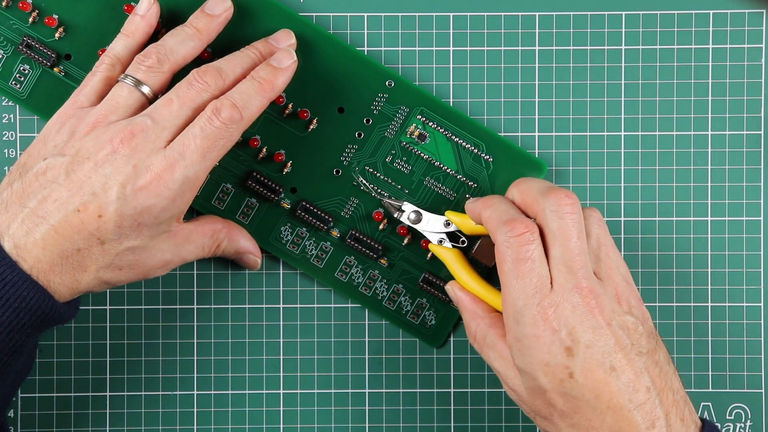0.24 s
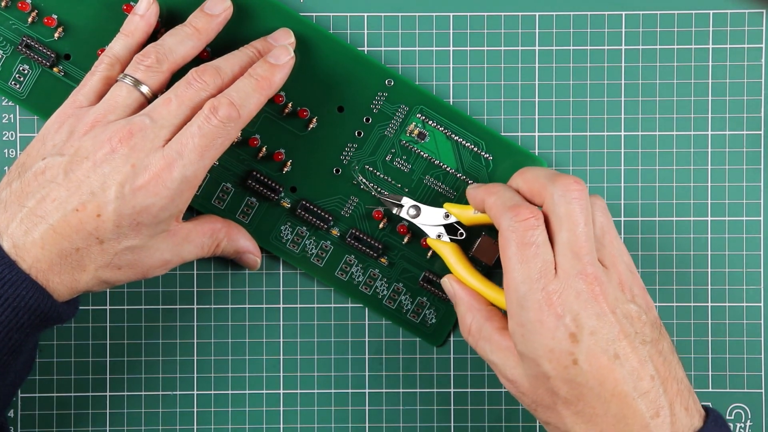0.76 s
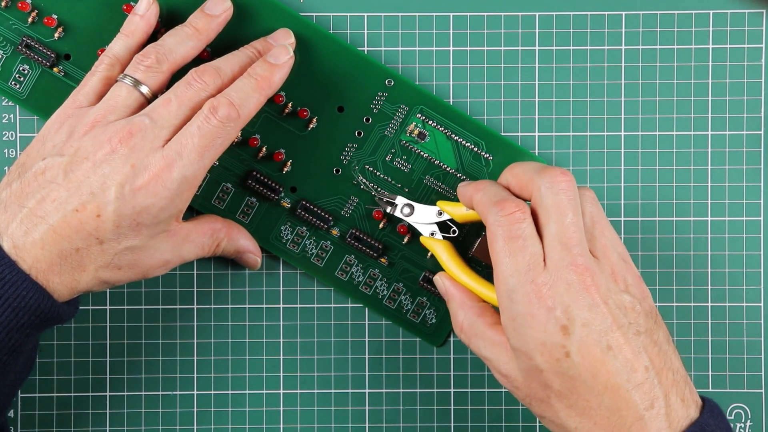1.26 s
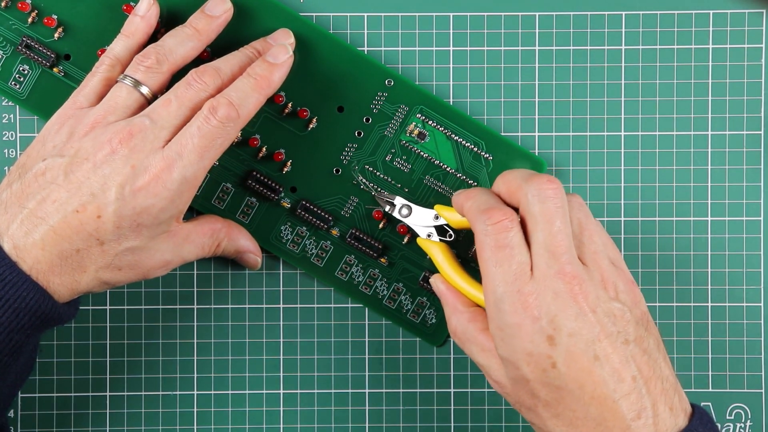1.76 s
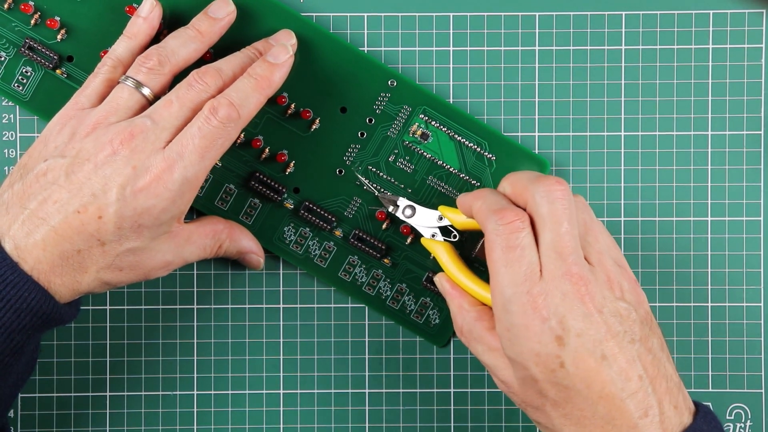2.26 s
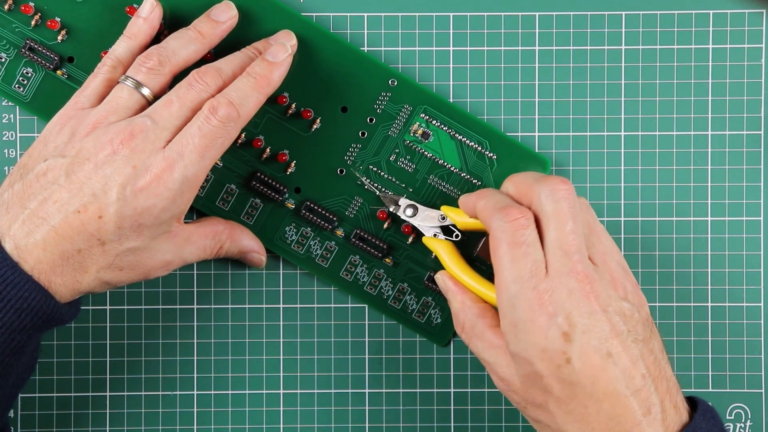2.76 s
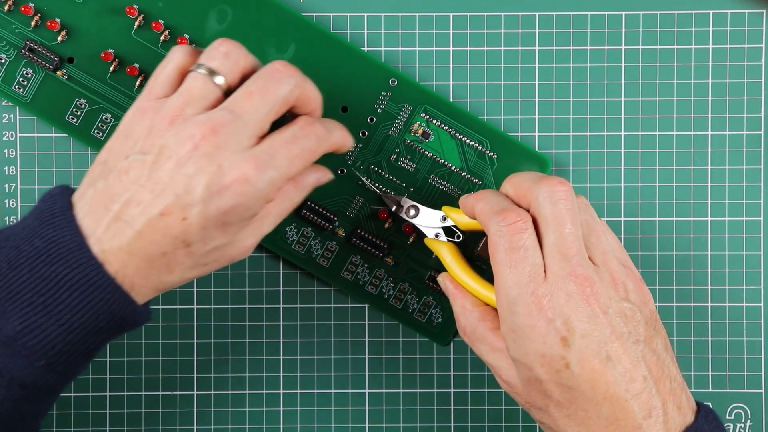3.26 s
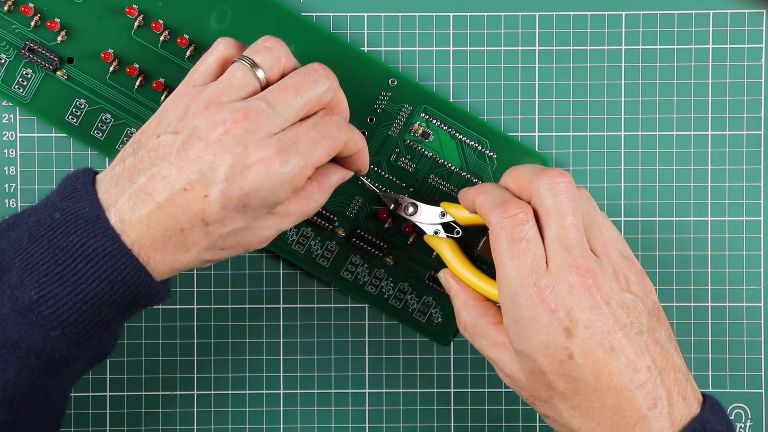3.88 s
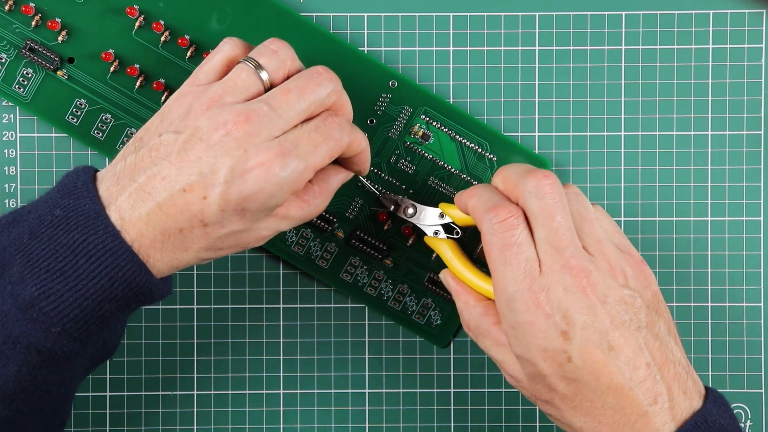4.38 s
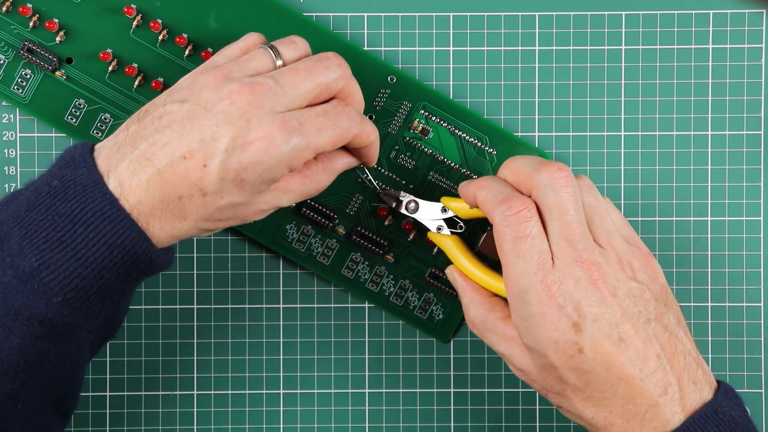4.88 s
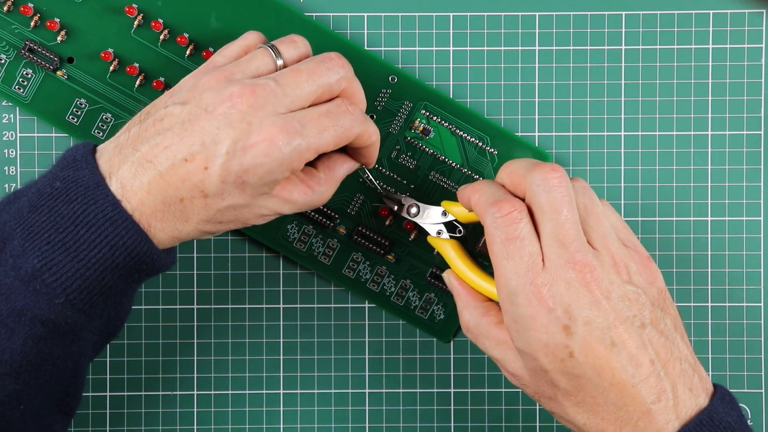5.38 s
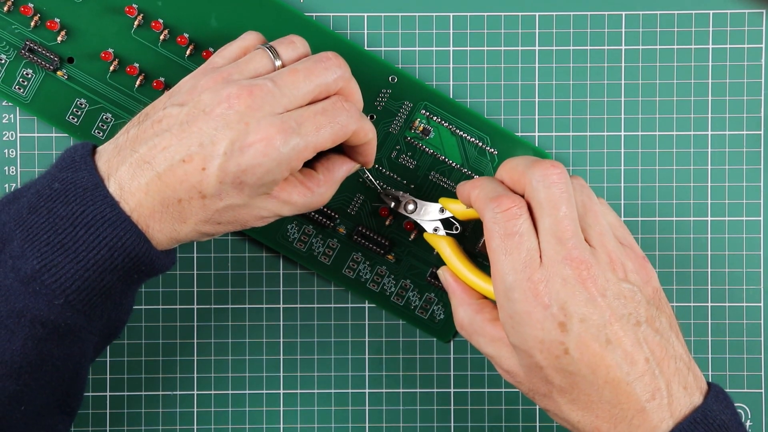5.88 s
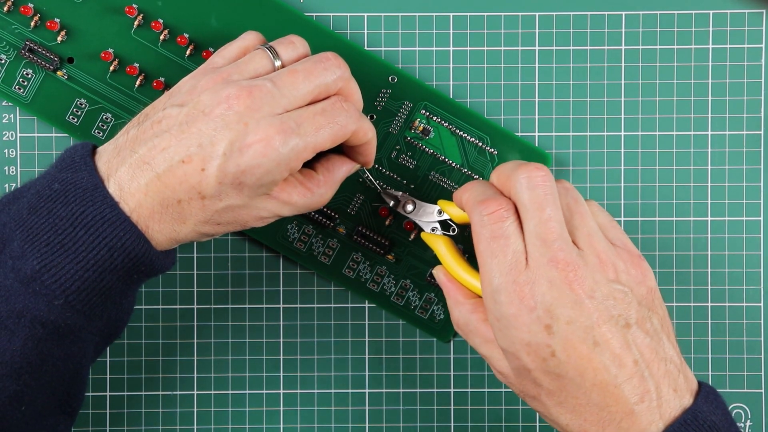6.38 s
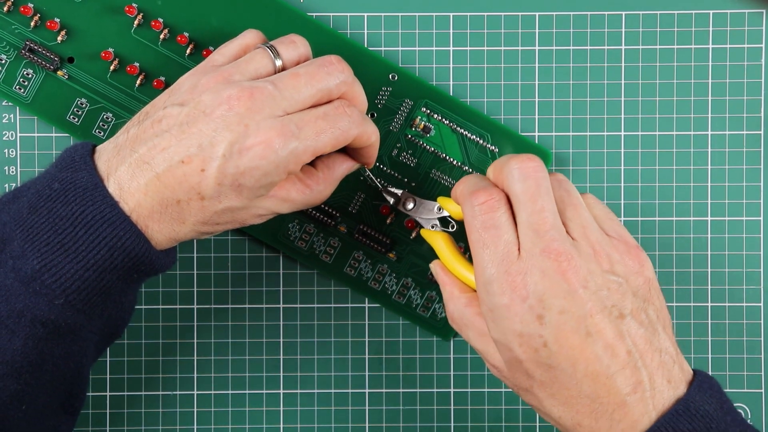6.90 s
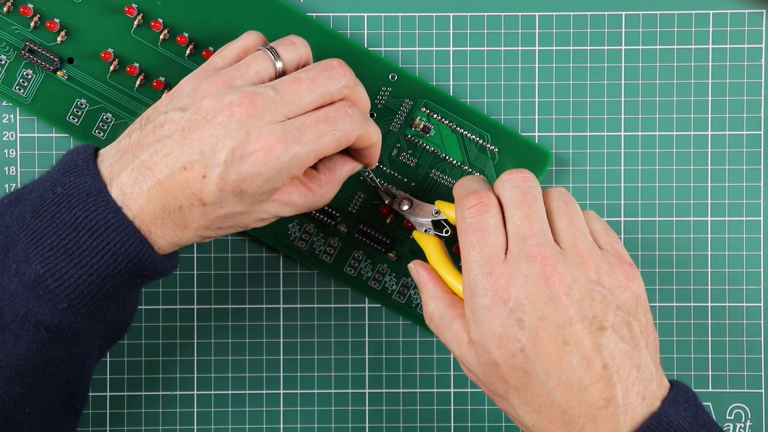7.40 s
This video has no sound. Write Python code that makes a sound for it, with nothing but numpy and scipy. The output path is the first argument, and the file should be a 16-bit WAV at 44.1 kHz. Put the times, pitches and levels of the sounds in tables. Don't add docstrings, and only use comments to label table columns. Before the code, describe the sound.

Close, mostly dry sound in a small room, with very low swaying building rumble and faint hiss that ducks after each loud sound. At 0.4 s small steel cutters snip a lead: a sharp click with a clack right behind it, then tiny bright offcut ticks and scratches until 0.8. A short dull board thud comes at 0.95, with soft jaw clacks at 1.1 and 1.3. At 2.07 a second snip is louder in the wire, brighter and crisper. The board knocks on the mat at 2.34 and 2.41, weaker at 2.86. Around 3.1 tips touch with a brief metallic ring; scrapes follow at 3.3-3.5. Sparse faint touches and scratches fill 3.9-5. Clacks and a board nudge at 5.2-5.3 lead to two hard jaw snaps at 5.43 and 5.47. Quiet nudges and ticks follow, a clack at 7.36 and a last bright tick at 7.63.

```python
import sys
import numpy as np
from scipy import signal
from scipy.fft import rfft, irfft, next_fast_len
from scipy.io import wavfile
from scipy.ndimage import uniform_filter1d, map_coordinates

SR = 44100
rng = np.random.default_rng(int(sys.argv[2]) if len(sys.argv) > 2 else 0)


def log_audio(samples):
    frames = np.atleast_2d(samples).T
    limited = np.clip(frames, -1, 1)
    pcm = np.round(limited * 32767).astype(np.int16)
    wavfile.write(sys.argv[1], SR, pcm)


def boost_factor(decibels):
    exponent = np.asarray(decibels, float) / 20
    return 10 ** exponent


N = 337365

# freq_hz, density_db_per_hz
RUMBLE_SPECTRUM = [(8.8, -40.5), (15, -6.5), (55, -1.5), (130, -9.5), (204, -14), (269, -18.5), (308, -35),
                   (400, -28), (520, -76.5), (880, -120)]
# time_s, level_db; it swells with the heavier blows and drops briefly at 1.64 s and
# 2.83 s
RUMBLE_LEVEL = [(0.0, -77), (0.04, -64.5), (0.36, -64), (0.47, -52), (0.58, -65.5), (1.25, -66),
                (1.38, -58), (1.64, -76), (1.66, -66), (2.73, -61.5), (2.83, -76.5), (2.9, -60.5),
                (3.32, -66), (5.41, -62.5), (5.43, -53), (5.67, -67), (7.56, -66.5), (7.65, -56.5)]
RUMBLE_GAIN_DB, RUMBLE_SWAY_DB = 2.5, 1.05

BAND_EDGES_HZ = [280, 900, 1500, 2500, 4800, 7600, 12100, 15800]
# hiss_db, memory_s, cut_db_per_db under remembered level, deepest_cut_db
SUPPRESSOR = [(-78, 0.71, 0.47, 16), (-81, .65, 0.8, 11.5), (-81.5, .75, 1, 15), (-79.5, 0.72, 1, 25.5),
              (-77, 0.81, 0.83, 27), (-75, .72, 0.73, 25), (-75.5, 0.47, 0.4, 13)]
LOUD_POWER = .22
FAST_S, SMOOTH_S = 0.058, 0.022
TAIL_SHARE = 0.19

# freq_hz, t60_s
ROOM_DECAY = [(250, .75), (1000, .68), (3000, .55), (8000, .4), (12000, .33), (16000, .28)]
# freq_hz, gain_db
TOP_ROLLOFF = [(15500, -0.5), (16000, -10.5), (16800, -26)]
TOP_HZ = 16800

# freq_hz, width_hz, level_db
BOARD = [(309.8, 25, -2), (440, 35, 2.5), (503.8, 40, -1), (580, 43, 0), (689, 60, -6.5), (872, 90, -4),
         (1080, 140, -12)]
# freq_hz, width_hz, level_db
JOINT = [(1611, 290, -14), (1906, 97, 2), (2156, 69, -2), (2311, 130, -2)]
# freq_hz, width_hz, level_db
BLADES = [(2680, 210, -3), (3080, 60, 3.5), (3294, 110, -2), (3850, 350, 1), (4355, 110, -7.5)]
# freq_hz, width_hz, level_db
LEAD = [(5790, 1800, 1.5), (6100, 2400, 6), (7055, 5200, -1)]
# freq_hz, width_hz, level_db
OFFCUT = [(8385, 1100, -1.5), (11100, 4500, 4), (12120, 900, -6.5), (12550, 900, -10.5), (13600, 850, -6.5)]
BODIES = [BOARD, JOINT, BLADES, LEAD, OFFCUT]
DRIVE_DB = [6.1, 4.2, 3.6, 2.9, 4.2]

# start_s, pitch_hz, level_db before rise and decay, t60_s, rise_s
RINGS = [(0, 1385, -70, .9, .004), (0, 1250, -75, .9, .004), (.9455, 530, -15, .032, .012),
         (1.009, 7250, -44, .04, .002), (1.012, 13600, -56, .1, .003), (1.022, 6150, -43, .035, .006),
         (1.274, 7000, -47, .07, .003), (3.076, 1278, -19, .13, .05), (3.08, 1292, -59, .9, .02),
         (3.335, 1880, -47, .1, .004), (4.62, 36, -43, .5, .01), (5.641, 480, -39, .05, .005)]
# start_s, length_s, board_db, cutter_db, wire_db
SCRAPES = [(0.649, 0.022, -83, -82, -61), (0.68, 0.076, -73, -92, -66), (0.941, 0.022, -69.5, -72, -68.5),
           (1.016, 0.092, -76, -86, -73), (1.257, 0.034, -60.5, -71.5, -65), (2.027, .13, -72, -72.5, -73),
           (3.024, 0.15, -94.5, -72, -71.5), (3.312, 0.07, -68, -59.5, -58), (3.373, 0.056, -74, -80, -74),
           (3.499, .088, -76, -76, -77.5), (4.193, 0.027, -62.5, -75, -64.5),
           (4.398, 0.049, -73, -81.5, -79.5), (4.531, 0.064, -72, -79.5, -72),
           (4.842, 0.17, -91, -84, -74.5), (5.877, 0.05, -67, -89, -79), (6.7, 0.043, -72.5, -76, -87),
           (6.966, 0.089, -66.5, -63.5, -66.5), (7.632, 0.024, -92, -74, -54.5)]
SCRAPE_LEAD_DB = -4

# start_s, strength_db, softness (0-2)
NUDGES = [(.5488, -49.5, .8), (0.7649, -51.5, 1), (1.0234, -55, .8), (5.2355, -36, 0.67),
          (5.6425, -46.5, .5), (5.7897, -54, .9), (6.3927, -49, 1.25), (6.6159, -68, 1), (7.1895, -51, .45),
          (7.3093, -59.5, 1)]
SOFT_DB = [2, -13.5, -25, -28, -31]
# start_s, strength_db, lead_re_strength_db
TICKS = [(0.4847, -39, 8), (0.5489, -61, 22), (.6885, -42, -26), (0.7104, -45.5, -37), (0.7363, -44.5, -26),
         (0.7654, -52, -22), (1.0105, -61, 5), (1.2781, -46, -2), (1.8766, -64, -28), (4.9409, -55.5, -11),
         (6.3929, -46.5, -7.5), (7.3082, -65, -31), (7.6291, -40, 1)]
TICK_DB = [-26, -27.5, -10.5]
# start_s, strength_db, board_re_strength_db, wire_re_strength_db
TOUCHES = [(.4595, -38.5, -1, 1), (.6565, -38.5, -1.8, -17), (2.2539, -50.5, 1, 4.5),
           (2.9825, -65.5, -8.5, -9.5), (3.0425, -55, -28, -16), (3.0745, -42.5, -20, -0.2),
           (3.1349, -48, -28, -14), (3.3295, -42, -7.5, 2), (3.5005, -57.5, 0.5, -2),
           (3.9315, -54.5, -0.3, -13.5), (4.1905, -39.5, -11.5, -9.5), (4.7395, -58, -2.5, -5),
           (4.9735, -61.5, -27, 1), (6.3875, -58.5, 7.5, -3), (7.1295, -59.5, 4.5, -9)]
TOUCH_DB = [-3.5, -1]
# start_s, strength_db, board_re_strength_db, wire_re_strength_db
CLACKS = [(.4545, -31.5, -2.5, -16), (1.092, -44, 6.5, -15), (1.3295, -40, 3, -4.5), (2.4265, -55, 8, -30),
          (3.0945, -57.5, -13, -33), (4.7905, -57, -16, -18), (5.2082, -60, 6, -11),
          (5.2261, -38.5, 3.5, -9.5), (5.288, -43.5, 4.5, -2), (5.3315, -38.5, 1.5, -4.5),
          (5.8935, -51, -8, -13), (6.0345, -66, -19.5, -16), (7.3575, -38.5, -2.3, -16.5)]
CLACK_DB = [0.5, -13.5]
WIRE_DB = [-2.5, 1]

# start_s, strength_db, softness (0-2)
KNOCKS = [
    (2.3448, -34.5, 0.76),
    (2.4064, -37.5, 0.92),
    (2.8577, -43, .9),
    (2.9899, -56, 1.24),
]
MAT_S = 0.00059
THUD_DB, THUD_HZ, THUD_S = 8.5, 577, 0.00074

# start_s, strength_db, board_re_strength_db, wire_re_strength_db
SNAPS = [
    (5.4342, -33, 4.5, -7.5),
    (5.4722, -28, -2, -11),
]
SNAP_DB = [.3, -2.5]
CLICK_DB, CLICK_HZ, CLICK_S = 12.5, 2330, 0.00021

# start_s, board_db, blades_db, lead_db, offcut_db
SNIPS = [
    (0.3938, -25, -13, -24, -18),
    (2.0742, -27.5, -19, -11.5, -11.5),
]
SNIP_JOINT_DB = 6


def unit(x):
    return x / np.sqrt(np.mean(x ** 2) + 1e-20)


def along(points, hz):
    f, v = np.transpose(points)
    return np.interp(np.log(hz + 1), np.log(f + 1), v)


def wobble(rate_hz):
    knots = rng.standard_normal(int(N * rate_hz / SR) + 4)
    return map_coordinates(knots, [np.arange(N) * rate_hz / SR])


def filtered(x, response):
    m = next_fast_len(N + SR // 2)
    return irfft(rfft(x, m) * response(np.fft.rfftfreq(m, 1 / SR)), m)[..., :N]


def mean(x, seconds, late=0):
    size = 2 * round(seconds * SR / 2) + 1
    return np.abs(uniform_filter1d(x, size, origin=late * (size // 2), mode="nearest"))


def background():
    rumble = filtered(rng.standard_normal(N), lambda hz: boost_factor(along(RUMBLE_SPECTRUM, hz)))
    level_db = np.interp(np.arange(N) / SR, *np.transpose(RUMBLE_LEVEL))
    return boost_factor(level_db + RUMBLE_GAIN_DB + RUMBLE_SWAY_DB * wobble(6)) * unit(rumble)


def hiss(sound):
    out = sound.copy()
    for low, high, (hiss_db, memory_s, slope, max_cut_db) in zip(BAND_EDGES_HZ, BAND_EDGES_HZ[1:], SUPPRESSOR):
        pair = np.array([sound, rng.standard_normal(N)])
        heard, noise = filtered(pair, lambda hz: (hz > low) & (hz <= high))
        now = mean(heard ** 2, FAST_S) + boost_factor(2 * hiss_db)
        before = mean(now ** LOUD_POWER, memory_s, late=1) ** (1 / LOUD_POWER)
        cut_db = np.clip(slope * 10 * np.log10(before / now), 0, max_cut_db)
        cut_db = mean(cut_db, SMOOTH_S)
        out += boost_factor(hiss_db - cut_db + .5 * wobble(3.1)) * unit(noise)
        out += (boost_factor(-TAIL_SHARE * cut_db) - 1) * heard
    return out


def room(x, gap_s, count=3):
    hz, t, z = signal.stft(rng.standard_normal((count, SR)), SR, nperseg=256)
    decay = boost_factor(-60 * t / along(ROOM_DECAY, hz)[:, None])
    tails = signal.istft(z * decay, SR, nperseg=256)[1]
    path = np.arange(N) // (SR // 8) % count == np.arange(count)[:, None]
    late = np.pad(x * path, ((0, 0), (round(gap_s * SR), 0)))
    return signal.fftconvolve(late, tails / np.linalg.norm(tails[0]), axes=1).sum(axis=0)[:N]


def body_response(modes, f, spread):
    tone = 0
    for k, (center_hz, width_hz, db) in enumerate(modes):
        loss = 1j * f * width_hz * spread
        tone = tone + (-1) ** k * boost_factor(db) * loss / (center_hz * center_hz - f * f + loss)
    tone = tone + boost_factor(-11.5)
    edges_hz = [.8 * modes[0][0], 1.15 * modes[-1][0]]
    tone = tone * signal.freqs(*signal.butter(3, edges_hz, "bandpass", analog=True), f)[1]
    return tone / np.sqrt(np.mean(np.abs(tone) ** 2))


def bodies(force, spread):
    def responses(hz):
        return np.array([body_response(modes, hz, spread) for modes in BODIES])
    return boost_factor(DRIVE_DB) @ filtered(force[:, :N], responses)


def contacts(events, force, kicks, contact_s, rise_s, spike_db, settle_s, settle_db):
    t = np.arange(SR // 20) / SR
    shape = np.exp(-t / contact_s) + boost_factor(settle_db) * np.exp(-t / settle_s)
    shape = shape * (1 - np.exp(-t / rise_s))
    size = np.linalg.norm(shape)
    for s, *push_db in events:
        push = shape * rng.standard_normal((len(BODIES), len(t)))
        push *= size / np.linalg.norm(push, axis=1, keepdims=True)
        push[:, 0] = boost_factor(spike_db) * size
        force[:, round(s * SR):][:, :len(t)] += boost_factor(push_db)[:, None] * push
        later = np.round((s + rng.uniform(0, 0.0081, len(BODIES))) * SR).astype(int)
        kicks[np.arange(len(BODIES)), later] += boost_factor(push_db) * size


def steel(rows, cutter_db):
    out = []
    for s, db, board_db, wire_db in rows:
        wire = wire_db + np.array(WIRE_DB)
        out.append((s, *(db + np.array([board_db, *cutter_db, *wire]))))
    return out


def soft(rows, gain_db=0):
    return [(s, *(db + gain_db + softness * np.array(SOFT_DB))) for s, db, softness in rows]


def thuds(rows, over_db, hz, push_s):
    blows, t = np.zeros(N), np.arange(SR // 50) / SR
    for s, db, *_ in rows:
        blows[round(s * SR)] = boost_factor(db + over_db)
    swing = t / push_s * np.exp(1 - t / push_s) * np.sin(2 * np.pi * hz * t)
    return signal.fftconvolve(blows, swing)[:N]


def rings():
    out, t = np.zeros(N + SR), np.arange(SR // 2) / SR
    for s, hz, db, t60_s, rise_s in RINGS:
        phase = 2 * np.pi * hz * t + 0.84 * wobble(hz / 18)[:len(t)]
        level = boost_factor(db - 60 * t / t60_s) * (1 - np.exp(-t / rise_s)) ** 2
        out[round(s * SR):][:len(t)] += level * np.sin(phase)
    return out[:N]


def scrapes():
    force = np.zeros((len(BODIES), N + SR))
    for s, length_s, board_db, cutter_db, wire_db in SCRAPES:
        grit = boost_factor(3.5 * wobble(300)[:SR // 4]) * rng.standard_normal((len(BODIES), SR // 4))
        swell = np.sin(np.pi * np.linspace(0, 1, round(length_s * SR)) ** .65) ** 2
        level = boost_factor([board_db, cutter_db, cutter_db, wire_db + SCRAPE_LEAD_DB, wire_db])[:, None]
        force[:, round(s * SR):][:, :len(swell)] += level * swell * unit(grit[:, :len(swell)])
    return force


def knocks():
    force, kicks = np.zeros((2, len(BODIES), N + SR))
    contacts(soft(KNOCKS, gain_db=-3), force, kicks, contact_s=0.00054, rise_s=0.00035, spike_db=6.0,
             settle_s=0.015, settle_db=-21.5)
    cushion = np.hanning(round(2 * MAT_S * SR) + 2)
    force[0] = signal.fftconvolve(force[0], cushion / cushion.sum())[:N + SR]
    return force, boost_factor(7) * kicks


def taps(force, kicks):
    ticks = [(s, *(db + np.array([*TICK_DB, lead_db, 0]))) for s, db, lead_db in TICKS]
    rows = steel(CLACKS, CLACK_DB) + steel(TOUCHES, TOUCH_DB) + ticks + soft(NUDGES)
    contacts(rows, force, kicks, contact_s=0.00065, rise_s=0.00034, spike_db=-2.0,
             settle_s=0.012, settle_db=-14.5)


def snaps(force, kicks):
    contacts(steel(SNAPS, SNAP_DB), force, kicks, contact_s=0.00061, rise_s=0.0002, spike_db=-4.0,
             settle_s=0.0086, settle_db=-12)


def snips(force, kicks):
    rows = [(s, board_db, board_db + SNIP_JOINT_DB, *rest) for s, board_db, *rest in SNIPS]
    contacts(rows, force, kicks, contact_s=0.0016, rise_s=0.00037, spike_db=-11.5,
             settle_s=0.0067, settle_db=-21)


def scene():
    force, kicks = knocks()
    snips(force, kicks)
    taps(force, kicks)
    snaps(force, kicks)
    drag = scrapes()
    tones = rings()
    diffuse = bodies(kicks + drag, spread=1.8) + boost_factor(-8) * tones
    sound = bodies(force + drag, spread=0.75) + tones
    sound += thuds(KNOCKS, THUD_DB, THUD_HZ, THUD_S)
    sound += thuds(SNAPS, CLICK_DB, CLICK_HZ, CLICK_S)
    sound += boost_factor(-8.5) * room(diffuse, gap_s=.003)
    return (hiss(sound) + background())[None]


def roll_off(x):
    return signal.sosfilt(signal.butter(12, 16850, fs=SR, output="sos"), x)


def record(dry):
    mix = filtered(dry, lambda hz: (hz < TOP_HZ) * boost_factor(along(TOP_ROLLOFF, hz)))
    return roll_off(mix)


dry = scene()
out = record(dry)
log_audio(out)
```